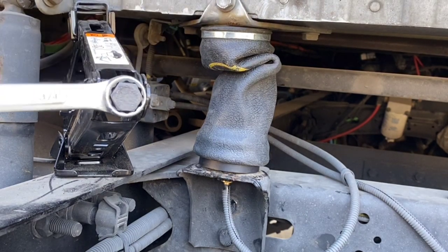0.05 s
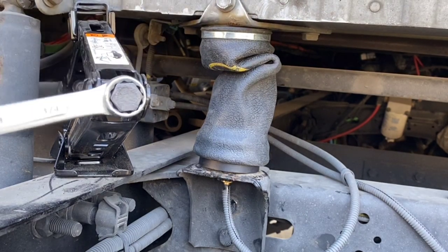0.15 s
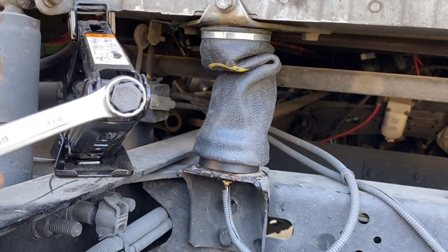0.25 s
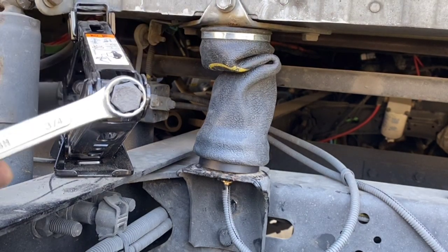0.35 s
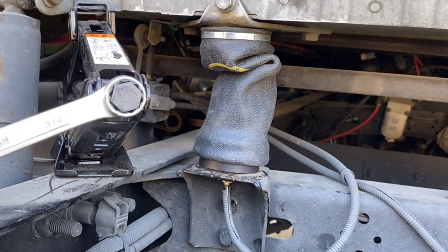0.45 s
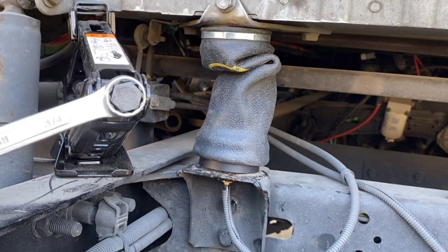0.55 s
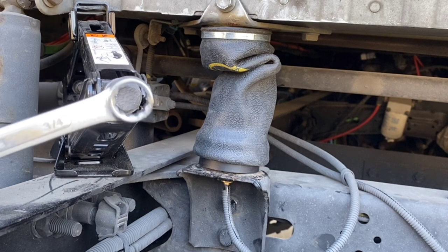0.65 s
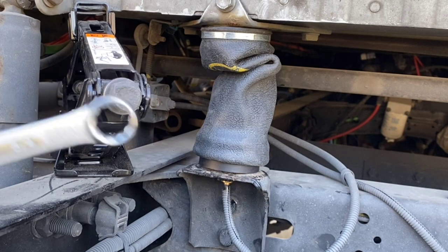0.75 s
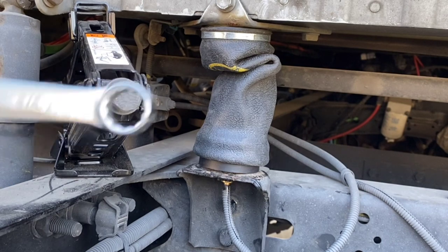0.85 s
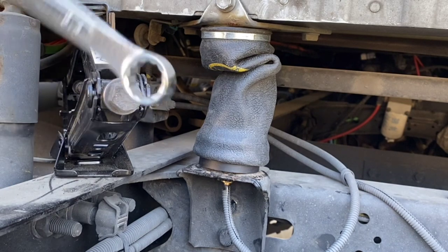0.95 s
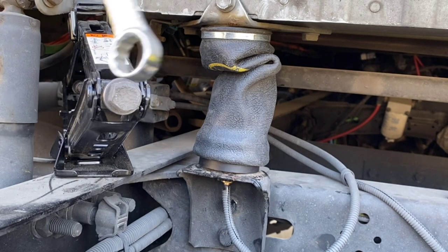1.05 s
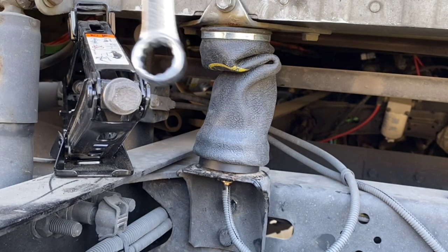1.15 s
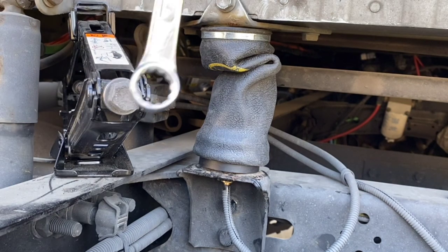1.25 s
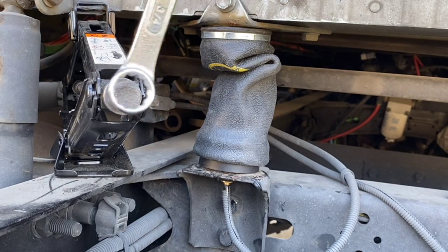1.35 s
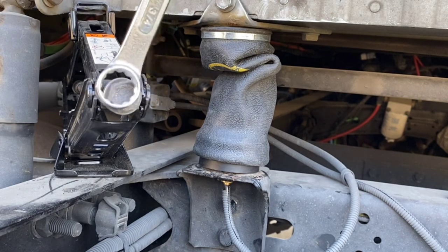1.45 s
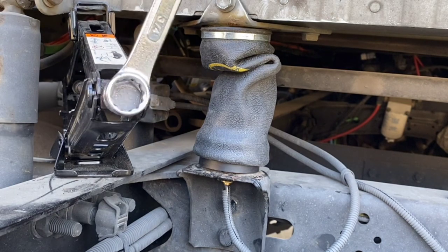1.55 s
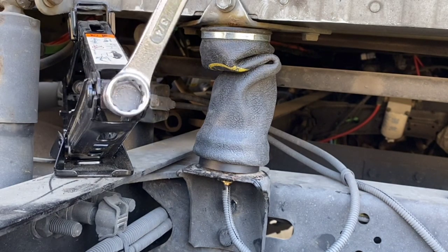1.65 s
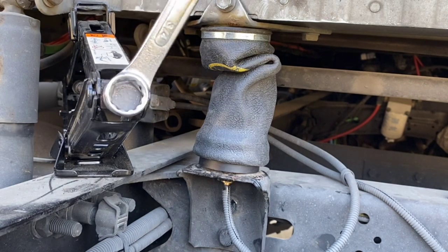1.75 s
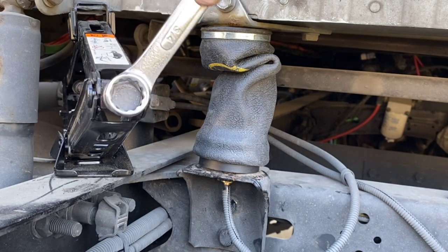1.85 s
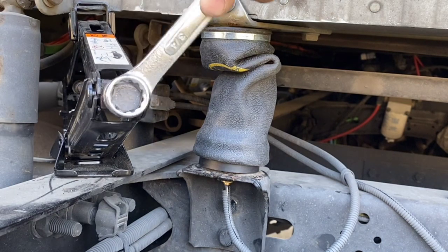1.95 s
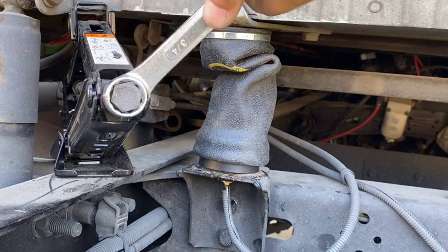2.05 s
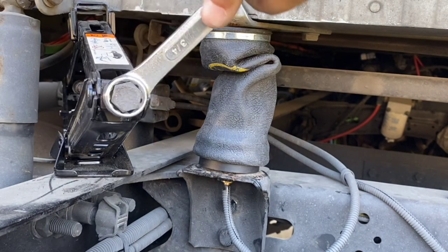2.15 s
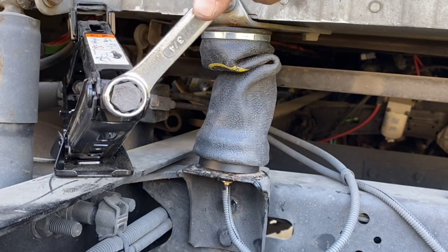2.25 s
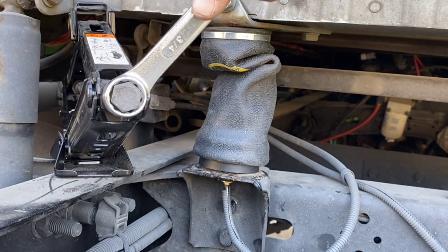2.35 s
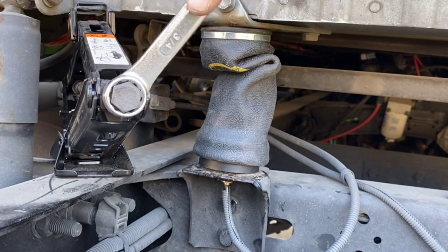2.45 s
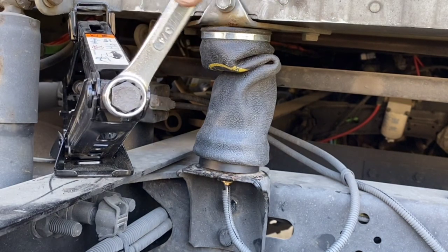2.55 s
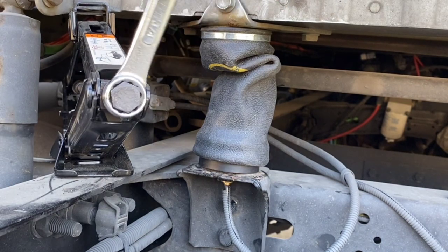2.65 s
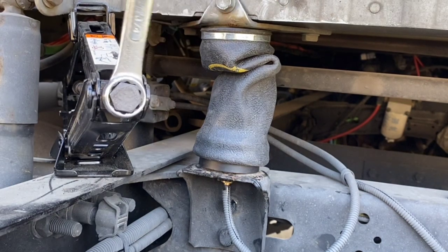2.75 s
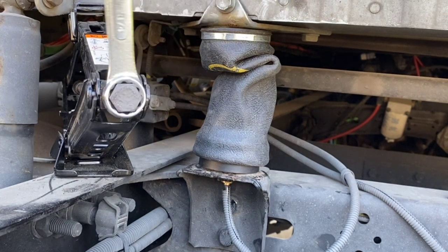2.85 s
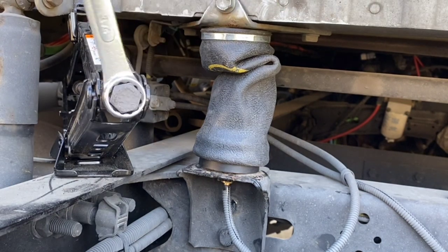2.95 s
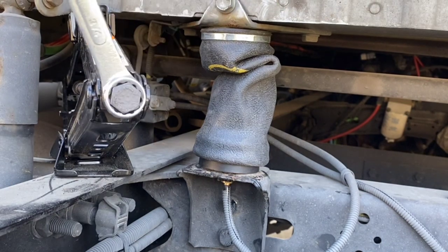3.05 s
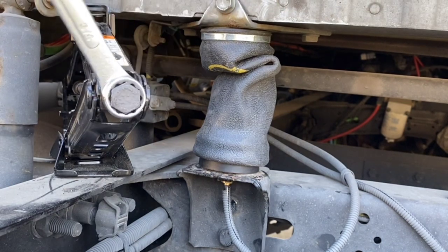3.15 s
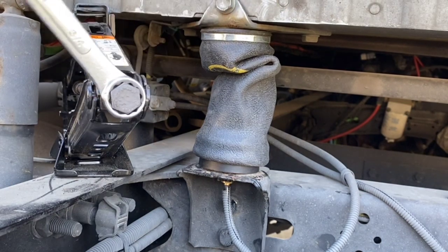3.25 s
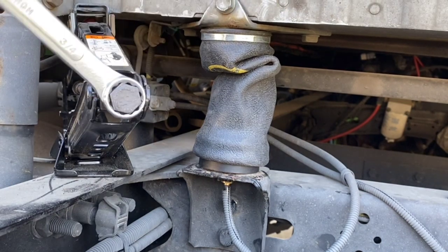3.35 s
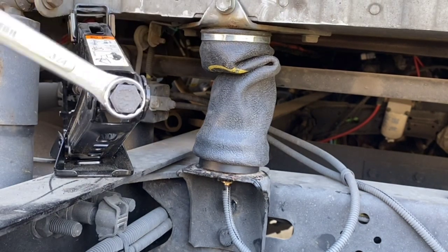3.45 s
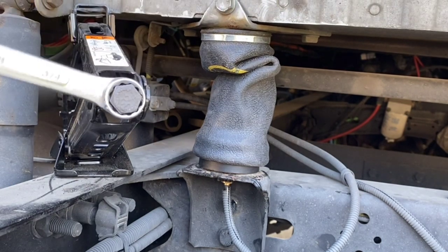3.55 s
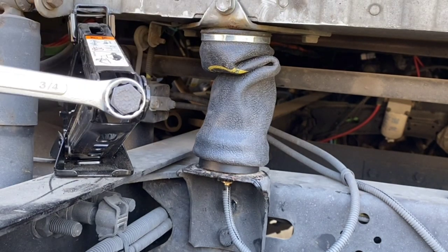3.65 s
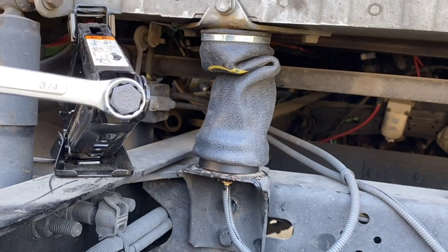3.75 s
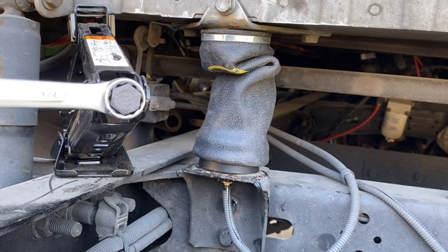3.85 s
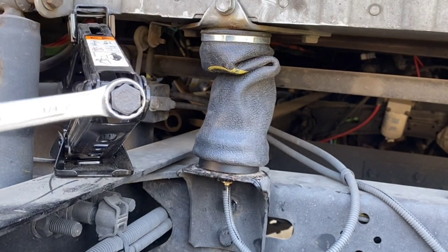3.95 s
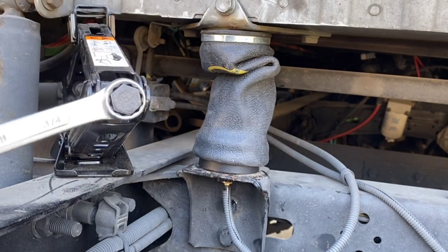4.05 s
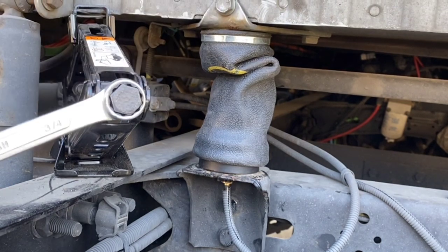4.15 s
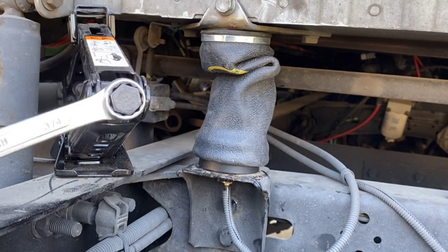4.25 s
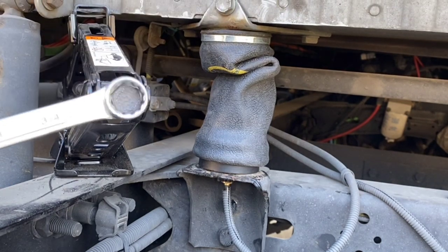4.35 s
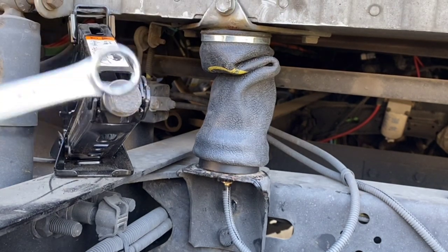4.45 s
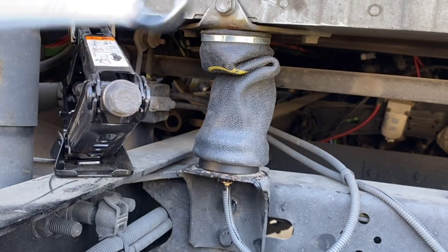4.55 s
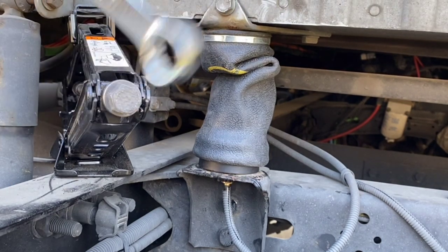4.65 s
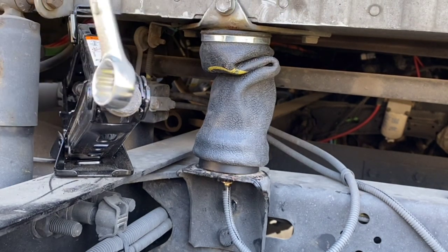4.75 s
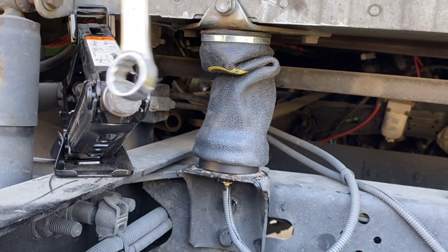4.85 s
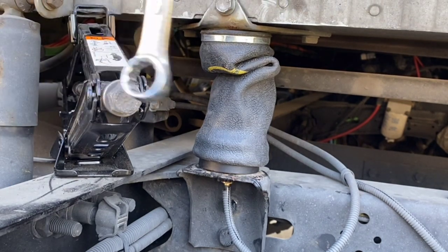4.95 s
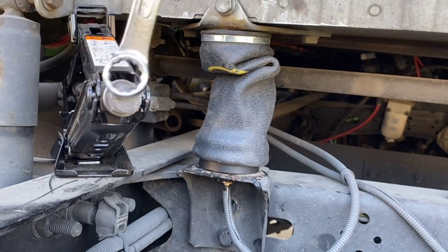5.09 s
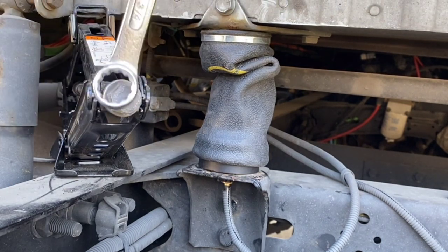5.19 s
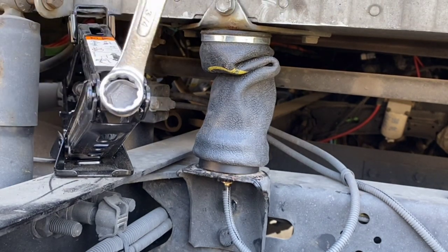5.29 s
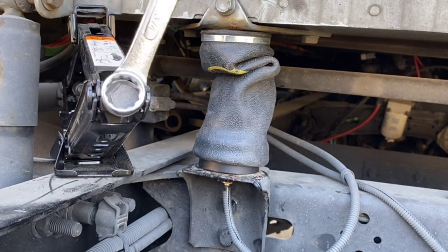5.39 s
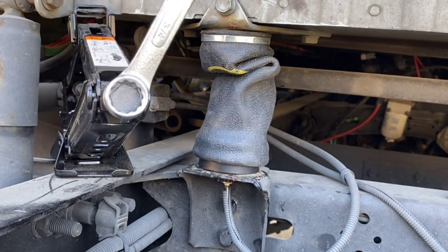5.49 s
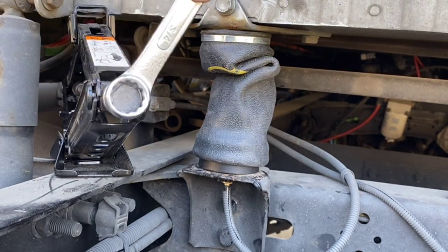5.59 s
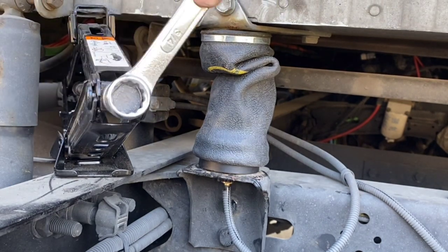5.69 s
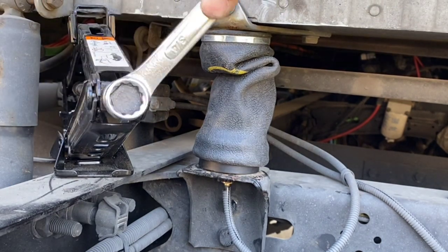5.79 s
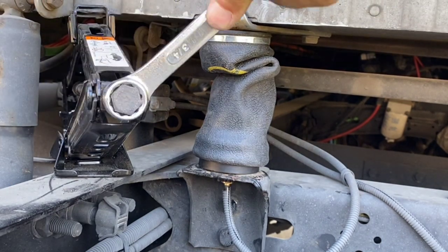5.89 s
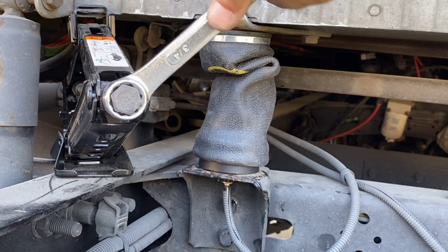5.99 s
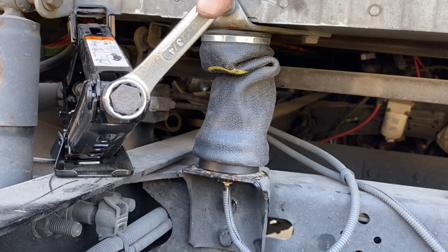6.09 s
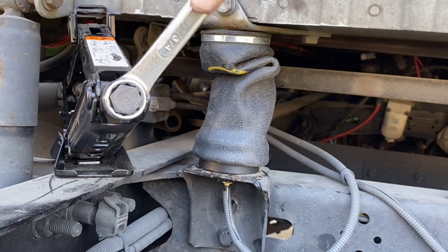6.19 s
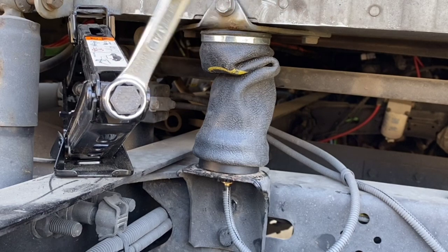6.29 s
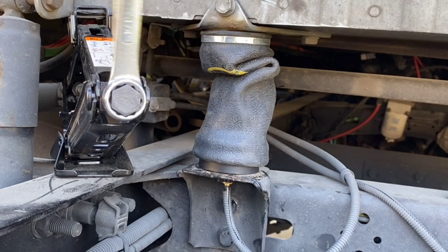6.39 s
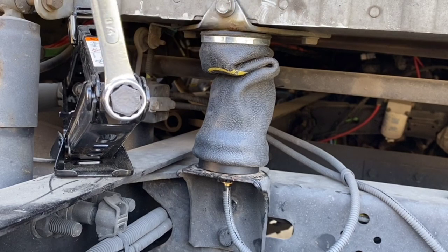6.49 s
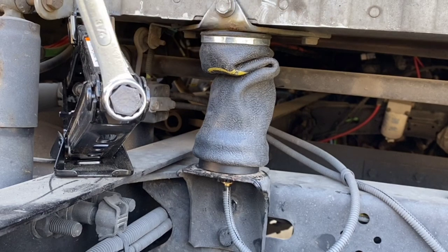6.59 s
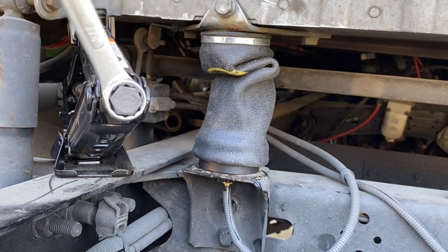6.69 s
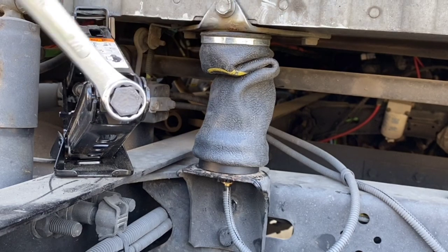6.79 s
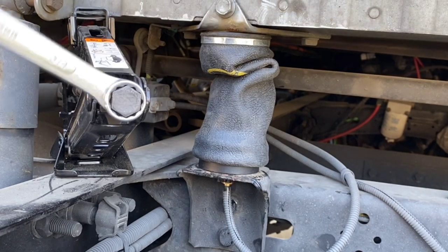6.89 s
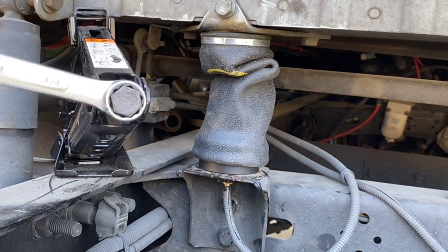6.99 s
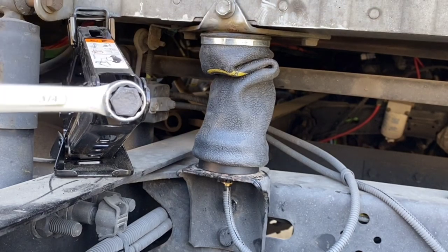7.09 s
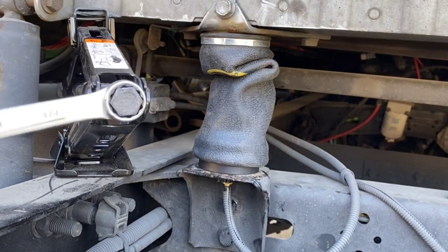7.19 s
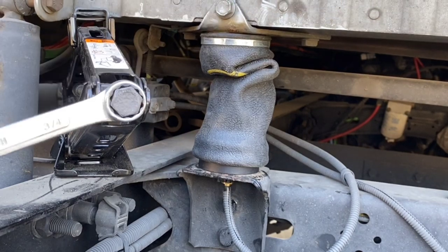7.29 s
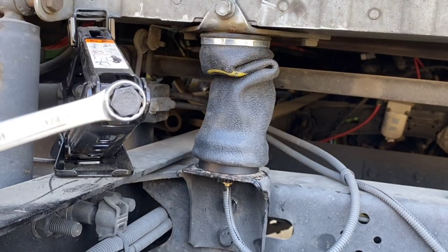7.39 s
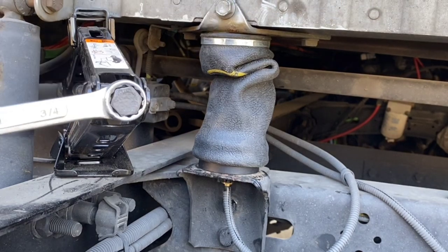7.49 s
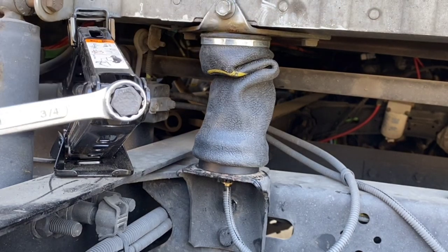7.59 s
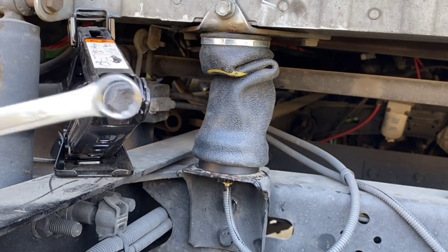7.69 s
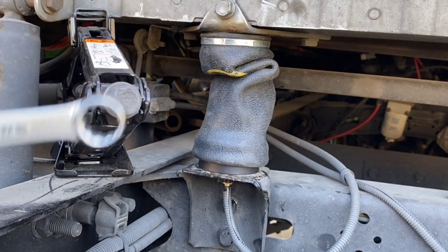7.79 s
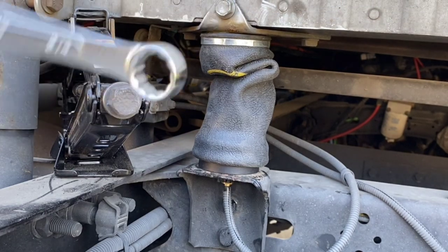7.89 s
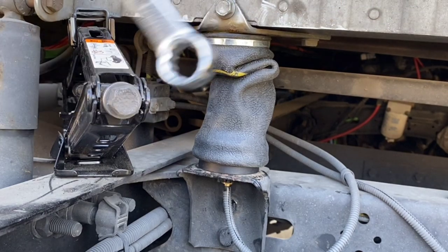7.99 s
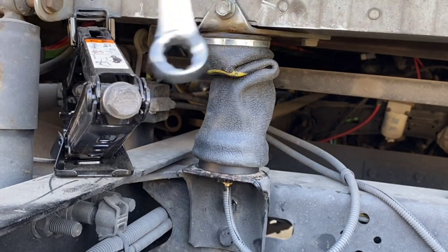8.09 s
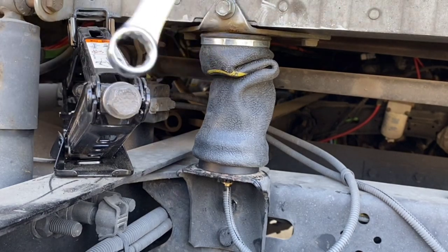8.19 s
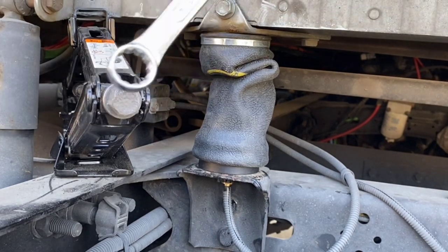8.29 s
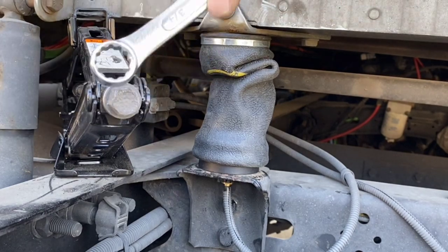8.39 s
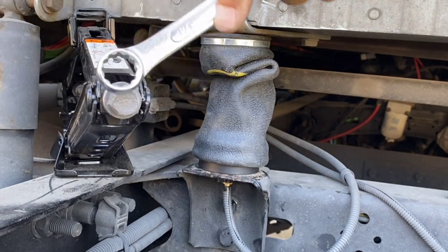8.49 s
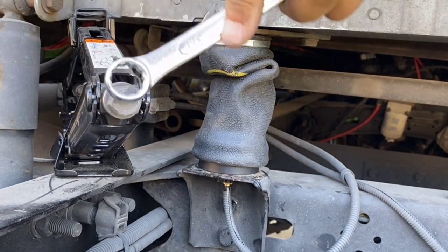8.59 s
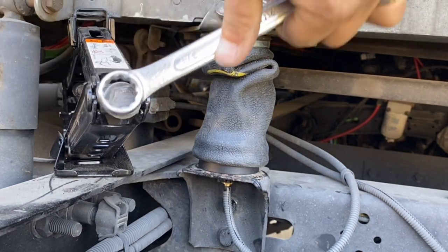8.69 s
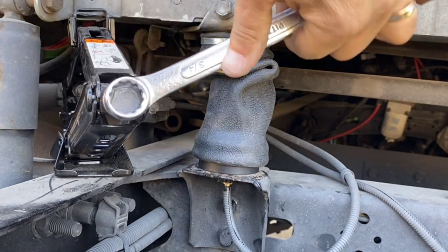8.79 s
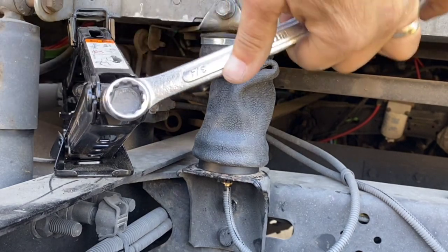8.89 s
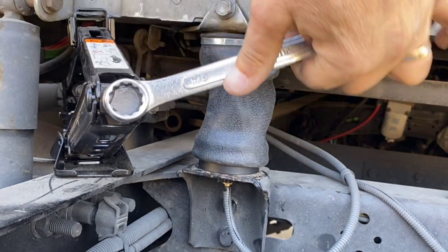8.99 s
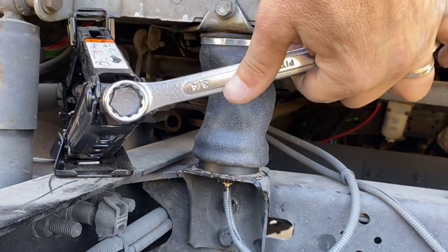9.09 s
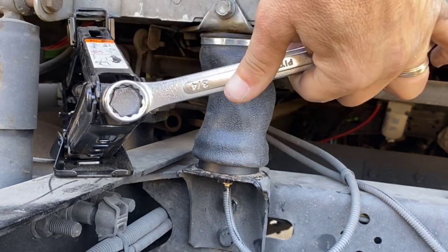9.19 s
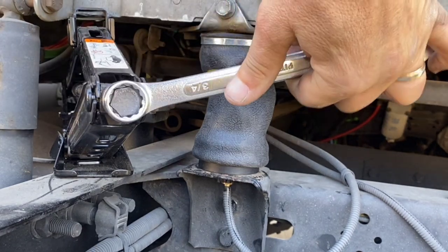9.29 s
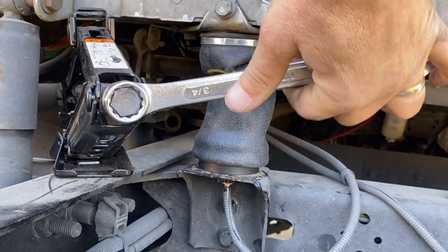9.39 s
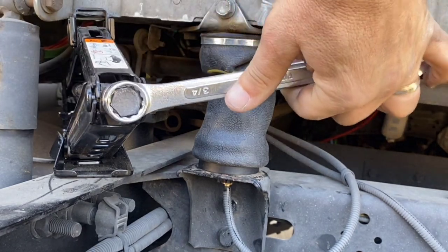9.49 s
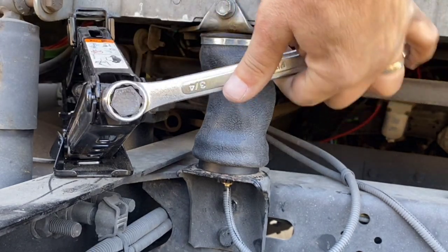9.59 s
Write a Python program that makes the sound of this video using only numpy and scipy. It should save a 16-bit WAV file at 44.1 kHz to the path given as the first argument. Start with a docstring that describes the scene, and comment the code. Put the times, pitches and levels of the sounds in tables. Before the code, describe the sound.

A wrench clacks, clinks and scrapes on a steel bolt head in short irregular bursts, over low outdoor traffic rumble and an idling drone.

```python
"""Outdoors, a scissor jack standing on a truck's frame is let down with a ring wrench.
The wrench knocks and scrapes on the hex head: bursts of tiny hits ring the wrench, jack and frame.
Soft rubs are fine slips heard through the jack; one dull rub, as the hand changes its hold, is noise.
Traffic is noise plus a low drone, under thin air and a bright hiss that fades early.
Near the end a distant engine speeds up: a wavering sine that climbs in pitch."""
import sys
import numpy as np
from scipy import signal
from scipy.fft import rfft, irfft, next_fast_len
from scipy.io import wavfile

SR = 44100
rng = np.random.default_rng(int(sys.argv[2]) if len(sys.argv) > 2 else 0)


def master_out(mix):
    """Clip the mix to full scale and print it as 16-bit PCM to the path in sys.argv[1]."""
    frames = np.transpose(np.atleast_2d(mix))
    ceiling = np.clip(frames, -1, 1)
    pcm = np.round(ceiling * 32767).astype(np.int16)
    wavfile.write(sys.argv[1], SR, pcm)


N = 425124   # length in samples

# Pitch registers of a contact, from thud, clunk, clonk, clank and clink to tick.
# Each row: lower edge in Hz, upper edge in Hz.
REGISTERS_HZ = [(130, 450), (450, 1050), (1050, 2050), (2050, 3200), (3200, 8500), (8500, 16000)]
# Knocks of the wrench on the hex head. Each row: start in seconds, chatter time in seconds, level in dB,
# brightness in dB per octave, midrange in dB, ring-out in dB, wrench note in Hz.
KNOCKS = [(.2888, 0.0035, -14, 0.5, -2.5, 1.5, 3856), (.601, 0.037, -31.5, -3, -6, -10, 1700),
          (.652, 0.00081, -28, -2.2, 6.5, 5, 1750), (1.442, 0.011, -22, 3, -9.5, 7, 4150),
          (1.547, 0.0085, -27, 1.6, -2, -3, 1800), (1.666, 0.0095, -31.5, -2.1, 1, -2.5, 3720),
          (1.904, 0.0015, -51, -0.5, -25, 6, 1652), (2.034, 0.019, -18.5, -3.1, 1.5, -5.5, 2356),
          (2.089, 0.0013, -43.5, -1, -12, -5, 2110), (2.182, 0.013, -39, -6.5, 13, -7.5, 1614),
          (2.5883, 0.0082, -36, 4, -14, -11.5, 3500), (2.625, 0.0027, -25.5, 5.5, -9, -0.5, 1295),
          (2.902, 0.0034, -66.5, 3, -19, -13, 3560), (3.226, 0.0024, -56.5, 1.2, -10.5, -6, 1296),
          (3.989, 0.001, -49, 7.5, -1.5, -14, 2490), (4.1222, 0.004, -29, 10.5, 21.5, -5, 2245),
          (4.125, .0015, -16, 3, -0.5, -1.5, 2400), (4.307, 0.058, -35.5, -2.5, -3, 1, 1450),
          (5.13, 0.0044, -30, 3.5, -8, 2, 3430), (5.189, 0.0067, -31.5, 3.4, 0, 2.5, 4888),
          (5.371, 0.0022, -35.5, -4.5, 5.5, 2.5, 1455), (5.424, 0.012, -35, -2.8, 3, 10.5, 1500),
          (5.466, .003, -25, -2.5, -1, -5, 1808), (5.9828, 0.009, -38.5, 0.8, -12, 8.5, 1440),
          (6.0138, 0.0082, -18, 3, -9.5, -1, 4190), (6.406, 0.01, -55, -1.5, -26, 4, 1640),
          (6.582, 0.0047, -44.5, -1.5, -3.5, 1, 2690), (6.9135, 0.0026, -60, 2.5, -9.5, 0, 5560),
          (7.412, 0.0074, -31, -4.5, 11.5, 7.5, 1017), (7.439, 0.017, -34, -4, 12, -11, 1020),
          (7.5005, 0.0011, -47.5, -1.4, -16, -23, 3430), (8.132, 0.0018, -53, 5.5, -19.5, -7, 9603),
          (8.223, 0.0011, -54, 8.5, -9.5, -9, 2917), (8.3615, .002, -64, 2, -17, -14, 4290),
          (8.706, 0.016, -16, 1.1, 4.5, 4, 1587), (8.779, 0.0025, -17.5, -0.1, 4, 5.5, 1668),
          (8.79, 0.013, -15.5, 0.1, -0.5, -4, 3156), (8.905, 0.012, -34, -6, 14, 2, 1570),
          (8.952, 0.011, -30.5, -6.5, 11, 0, 1675), (8.998, 0.0019, -37.5, 0, -4, 9.5, 1740),
          (9.009, 0.0068, -31.5, 1, -7.5, -3, 1840), (9.192, 0.0051, -50, -4, 9, 5, 3414),
          (9.561, 0.014, -18, 3.5, -4, 7, 5170)]
# Scrapes of steel sliding on steel. Each row: start in seconds, length in seconds, level in dB,
# brightness in dB per octave, midrange in dB, wrench note in Hz.
SCRAPES = [(.273, 0.008, -28.5, 3, 12, 2390), (.631, 0.037, -17, 2, 12.5, 2210),
           (1.525, 0.027, -26, 5, 11.5, 1807), (1.675, 0.033, -43, -5.5, -6.5, 2244),
           (1.918, 0.017, -36, -8.5, 8.5, 1430), (1.968, 0.037, -25.5, -.2, 12, 1167),
           (1.986, 0.033, -23.5, -2, -2.5, 1800), (2.835, 0.013, -54, -1, 2, 1070),
           (2.904, 0.0094, -60, -9.5, 2, 1650), (3.155, 0.029, -55.5, -10, 8.5, 1400),
           (3.42, .02, -64, -6.5, 8.5, 1205), (4.338, 0.063, -14.5, -0.5, 3, 1467),
           (5.437, 0.019, -30.5, -0.1, 4.5, 1520), (5.773, .024, -26, -2.5, -2, 1800),
           (5.838, 0.016, -17, -1.4, -2, 1703), (5.875, 0.043, -35, -2, 5.5, 1640),
           (7.637, 0.063, -17, 0.6, 4, 1771), (8.746, .018, -27, -3, 1.5, 1640),
           (9.05, 0.039, -42, -5, 0, 1690), (9.521, 0.019, -26, -3, 5.5, 1820)]
# Soft strokes of the rubbing screw and wrench. Each row: middle in seconds, width in seconds, level in dB.
RUBS = [(2.92, 0.24, -61.5), (3.15, .09, -59.5), (3.675, 0.019, -49.5), (3.75, 0.017, -52),
        (3.84, 0.016, -52.5), (3.97, .025, -56), (4.55, 0.18, -54.5), (6.44, 0.056, -55.5),
        (6.592, 0.04, -47), (6.85, 0.11, -60.5), (7.28, 0.032, -56.5), (7.56, 0.12, -59),
        (7.85, 0.037, -60.5), (8.041, .02, -56.5)]
# Level of each register in an ordinary knock. Each entry: level in dB, from thud to tick.
KNOCK_REGISTERS_DB = [-10.5, -1, -6.5, -10, -13, -21]
# Level of each register in an ordinary scrape. Each entry: level in dB, from thud to tick.
SCRAPE_REGISTERS_DB = [-10, 0, -7.5, -9, -14, -18]
# Single ringing notes (modes) of jack and frame.
# Each row: pitch in Hz, average height above the dense modes in dB, time to die by 60 dB in seconds.
FRAME_MODES = [(151.7, 11.5, 0.6), (303.5, 14.5, 0.31), (413.3, 13.5, 0.62), (537.6, 12.5, 0.53),
               (580, 8, 0.083), (678, 4.5, 0.43), (732, 10, 0.12), (836, 8, 0.85), (987.5, 12, 0.33),
               (1080, -8, 0.29), (1338, 6.5, .22), (1478, 14, 0.24), (1640, 16, 0.22), (1750, 11, 0.35),
               (1804, 5, 0.45), (2296, 12, 0.24), (2780, 11.5, .15), (3310, 2, 0.037), (4700, -9, 0.19),
               (5413, 5, 0.011), (6200, 3.5, 0.23), (7460, 12, 0.047), (9970, 11.5, 0.031),
               (10460, 3, 0.06), (14520, 19, 0.072)]
# Overall colour of the steel. Each row: frequency in Hz, strength in dB per Hz.
STEEL_COLOUR = [(100, -11.5), (155, -10), (240, -21), (400, -13), (550, -6), (800, 1.5), (1150, -7),
                (1650, -11), (2600, -22), (4500, -10), (6200, -17.5), (8200, -25), (11000, -29.5),
                (14800, -41.5), (16000, -50.5)]
# How alike left and right are in the ringing. Each row: frequency in Hz, correlation (no unit).
RING_LIKENESS = [(130, 0.36), (300, 0.99), (640, 0.34), (1400, 0.16), (2200, .85), (4000, 1), (8000, 0.92),
                 (15000, 0.1)]
# Colour of the screw's rub, with the resonances of the arms.
# Each row: frequency in Hz, strength in dB per Hz.
SCREW_COLOUR = [(350, 6.5), (560, 6.5), (800, -2.5), (1120, 13.5), (1900, -2.5), (2700, 4), (3200, 3.5),
                (3700, 3.5), (4800, -2), (5900, -3.5), (8000, -4), (11000, 0), (16000, -5.5)]
# Colour of the dull rub of the hand. Each row: frequency in Hz, strength in dB per Hz.
GRIP_COLOUR = [(90, -30), (150, -4.5), (225, -2.5), (300, -3.5), (450, -14), (600, -13.5), (720, -22.5),
               (900, -20.5), (1200, -31), (2000, -67)]
# Strength of the traffic's rumble and drone over time. Each row: time in seconds, change in dB.
TRAFFIC_STRENGTH = [(0, -1.5), (1.0, -2), (1.75, -3), (2.2, -2.5), (2.6, -0.5), (4.1, -3), (5.5, -1.5),
                    (6.35, -1.5), (6.62, 1.5), (7.0, .5), (8.7, -1.5), (9.1, 0.5), (9.64, -3)]
# Colour of the traffic rumble. Each row: frequency in Hz, strength in dB per Hz.
RUMBLE_COLOUR = [(15, -43), (25, -19.5), (32, -19), (42, -5), (55, -1.5), (90, 0), (125, -8.5), (165, -5.5),
                 (195, -14), (235, -30), (400, -62)]
# Colour of the thin air. Each row: frequency in Hz, strength in dB per Hz.
AIR_COLOUR = [(120, -18.5), (200, -4.5), (268, -11), (322, -12), (456, -13), (933, -16.5), (1080, -24),
              (1230, -20.5), (2510, -31.5), (4040, -52), (9060, -39), (11100, -33), (16000, -38)]
# Colour of the bright hiss at the start. Each row: frequency in Hz, strength in dB per Hz.
HISS_COLOUR = [(150, -35), (250, -2), (674, -11), (802, -11.5), (875, -3.5), (2490, -14.5), (3710, -10.5),
               (4260, -19.5), (6940, -11), (9010, -11.5), (10900, -16), (13200, -16), (16000, -15)]
# How alike left and right are in the background and rubs. Each row: frequency in Hz, correlation (no unit).
AIR_LIKENESS = [(60, .85), (200, 0.92), (400, 0.17), (1300, .05), (2400, 0.73), (4400, 1), (15000, 0.18)]
# Treble phase between the microphone ports. Each row: frequency in Hz, lead of the left side in radians.
PORT_PHASE = [(0, 0), (7300, 0), (8500, -2.8), (9400, -3.3), (10800, -6.1), (11600, -6.5), (12700, -9.2),
              (13900, -9.6), (14600, -12.3), (16100, -12.7)]
# Dips of the microphone ports. Each row: centre in Hz, width in Hz.
PORT_DIPS = [(8950, 800), (9250, 800), (13150, 900), (13500, 900)]

RING_SIZE = 32768   # samples in each ringing sound
LEVEL_WINDOW_S = 0.05   # a contact's level is its energy spread over this time
MIDDLE_HZ, REACH_OCTAVES = 1467, 3   # centre and reach of the brightness tilt and midrange arch
NOTE_LIFT_DB, NOTE_LIFT_OCTAVES = 5.5, 0.6   # registers near the wrench's note stand out
# the wrench's overtone as a pitch ratio, then the height of both notes above the dense modes
OVERTONE_RATIO, NOTE_DB, OVERTONE_DB = 1.98, 19.5, 13
SCRAPE_BITE = 0.6   # under 1: a scrape takes hold quickly
SMALL_MODE_COUNT = 36
FRAME_CUT_HZ = 6200
SLIPS_PER_S, SLIP_SPREAD_DB = 630, 3   # the fine stick and slip of a rub
GRIP_START_S, GRIP_ATTACK_S, GRIP_HOLD_S, GRIP_T60_S, GRIP_DB = 1.038, 0.016, 0.13, 0.26, -29.5
ENGINE_START_S, ENGINE_START_HZ, ENGINE_HZ_PER_S, ENGINE_ATTACK_S = 7.7, 127.7, 24, 0.26
ENGINE_LOUDEST_S, ENGINE_SWELL_S, ENGINE_DB = 9.1, 0.18, -34.5
RUMBLE_DB, AIR_DB = -36, -51.5
DRONE_HZ, DRONE_DB = 58.1, -43   # an idling engine
# the hiss sinks ever faster and is 30 dB down after HISS_FADE_S
HISS_DB, HISS_FADE_S, HISS_FADE_POWER = -43.5, 1.85, 4.7
CUTOFF_HZ = 16200


def from_db(db):
    """Turn decibels into a gain."""
    return 10 ** (np.asarray(db) / 20)


def unit(x):
    """Scale a sound to an average (rms) strength of 1."""
    return x / np.sqrt(np.mean(x ** 2) + 1e-20)


def at_hz(points, hz):
    """Read a table between its rows, on a logarithmic frequency axis."""
    f, value = np.transpose(points)
    return np.interp(np.log(hz + 1), np.log(f + 1), value)


def band_filter(x, order, edges_hz, kind):
    """Keep one part of the frequency range."""
    return signal.sosfilt(signal.butter(order, edges_hz, kind, fs=SR, output="sos"), x)


def stereo_colour(pair, spectrum, likeness):
    """Turn two unrelated signals into left and right with a given colour and likeness."""
    size = next_fast_len(pair.shape[1] + 2048)
    hz = np.fft.rfftfreq(size, 1 / SR)
    mid, side = rfft(pair, size) * from_db(at_hz(spectrum, hz))
    alike = np.clip(at_hz(likeness, hz), -0.99, 0.99)
    shared = np.sqrt(1 + alike) * mid
    opposed = np.sqrt(1 - alike) * side * [[1], [-1]]
    return irfft(shared + opposed, size)[:, :pair.shape[1]]


def drift(rate):
    """Wander by chance: random points, rate of them per second, joined by straight lines."""
    knots = rng.standard_normal(4096)
    return np.interp(np.arange(N) / SR * rate, np.arange(len(knots)), knots)


def noise(spectrum, level_db, flutter_db, rate):
    """Make stereo noise of a given colour whose level flutters."""
    bed = stereo_colour(rng.standard_normal((2, N)), spectrum, AIR_LIKENESS)
    return from_db(level_db) * unit(bed * from_db(flutter_db * drift(rate)))


def knocks(jacks):
    """A first hard touch, then a brief chatter as the wrench seats."""
    out, t = np.zeros((2, N)), np.arange(RING_SIZE) / SR
    for k, (s, chatter_s, level_db, bright_db, midrange_db, ring_db, note_hz) in enumerate(KNOCKS):
        clack, ring = jacks[k % len(jacks)]
        pressure = np.exp(-(t / max(chatter_s, 0.001)) ** 2)
        force = micro_impacts(pressure, per_s=2600, spread_db=-0.5)
        force[0] += 1.5   # the first touch
        body = clack + from_db(ring_db) * ring
        # a touch that is held fast leaves the wrench damped as well
        body = body + from_db(min(ring_db, 0)) * wrench(note_hz, t60=0.087)
        levels_db = contact_levels(KNOCK_REGISTERS_DB, level_db, bright_db, midrange_db, note_hz)
        add_contact(out, s, force, body, levels_db)
    return out


def scrapes(jacks):
    """The ring of the wrench judders over the flats: the slips swell and then die away."""
    out, t = np.zeros((2, N)), np.arange(RING_SIZE) / SR
    for k, (s, length_s, level_db, bright_db, midrange_db, note_hz) in enumerate(SCRAPES):
        clack, ring = jacks[k % len(jacks)]
        progress = np.minimum(t / length_s, 1)
        pressure = np.abs(np.sin(np.pi * progress)) ** SCRAPE_BITE
        force = micro_impacts(pressure, per_s=1700, spread_db=7.5)
        body = clack + from_db(-1.0) * ring + wrench(note_hz, t60=0.14)
        levels_db = contact_levels(SCRAPE_REGISTERS_DB, level_db, bright_db, midrange_db, note_hz)
        add_contact(out, s, force, body, levels_db)
    return out


def micro_impacts(pressure, per_s, spread_db):
    """Steel on steel touches many times; the hits follow the pressure and vary in size."""
    hits = rng.random(RING_SIZE) < per_s / SR
    direction = rng.choice([-1, 1], RING_SIZE)
    size = from_db(spread_db * rng.uniform(-1.8, 0.75, RING_SIZE))
    return pressure * hits * direction * size


def contact_levels(ordinary_db, level_db, bright_db, midrange_db, note_hz):
    """A harder touch tilts the sound upwards, a fuller one arches its middle; the note lifts its register."""
    centres_hz = np.sqrt(np.prod(REGISTERS_HZ, axis=1))
    octaves = np.log2(centres_hz / MIDDLE_HZ)
    tilt_db = bright_db * octaves
    arch_db = -midrange_db * (octaves / REACH_OCTAVES) ** 2
    from_note = np.log2(centres_hz / note_hz) / NOTE_LIFT_OCTAVES
    lift_db = NOTE_LIFT_DB * np.exp(-from_note ** 2)
    return level_db + np.array(ordinary_db) + tilt_db + arch_db + lift_db


def add_contact(out, s, force, body, levels_db):
    """Play a force through the body; place and hardness of the contact set each register's level."""
    sound = signal.fftconvolve(body, force[None], axes=1)[:, :RING_SIZE]
    sound = stereo_colour(sound, STEEL_COLOUR, RING_LIKENESS)
    start = int(s * SR)
    for edges_hz, db in zip(REGISTERS_HZ, levels_db):
        part = unit(band_filter(sound, 3, edges_hz, "band"))
        part = from_db(db) * part * np.sqrt(LEVEL_WINDOW_S * SR / RING_SIZE)
        out[:, start:start + RING_SIZE] += part[:, :N - start]


def wrench(note_hz, t60):
    """The two bending notes this hold leaves free; the hand damps the higher one faster."""
    overtone = mode(note_hz * OVERTONE_RATIO, OVERTONE_DB, t60 * 0.5)
    return mode(note_hz, NOTE_DB, t60) + overtone


def jack():
    """One chance version of the jack: the short clack of its arms, the longer ring of frame and underbody."""
    # rows inside dense_modes: frequency in Hz, time to die by 60 dB in seconds
    clack = dense_modes([(200, 0.19), (1000, 0.061), (3000, 0.086), (11000, 0.012)])
    # the contact itself radiates a short, bright crack
    crack = dense_modes([(2000, 0.04), (12000, 0.036)])
    clack = clack + from_db(-4.5) * band_filter(crack, 2, 2200, "high")
    ring = dense_modes([(150, 0.89), (1000, 0.34), (2800, 0.25), (7000, 0.1), (12000, 0.17)])
    # the heavy frame takes up less of the treble than of the bass
    ring = band_filter(from_db(-1.0) * ring, 1, FRAME_CUT_HZ, "low")
    for hz, db, t60 in FRAME_MODES:
        ring = ring + mode(hz, db + 0.84 * rng.standard_normal(), t60)
    # small modes of the arms get chance pitches; the higher the pitch, the shorter the ring
    small_modes_hz = np.exp(rng.uniform(np.log(2500), np.log(15500), SMALL_MODE_COUNT))
    for hz in small_modes_hz:
        ring = ring + mode(hz, 5 + rng.standard_normal(), t60=0.27 * (hz / 2500) ** -0.5)
    return clack, ring


def mode(hz, db, t60):
    """A dying sine whose resonance is db high; the two sides are a quarter turn apart in phase."""
    t, rate = np.arange(RING_SIZE) / SR, np.log(1000) / max(t60, 0.01)
    phase = rng.uniform(0, 2 * np.pi) + np.array([[0], [np.pi / 2]])
    height = from_db(db) * 2 * rate / SR   # the faster it dies, the harder it must start
    return height * np.exp(-rate * t) * np.sin(2 * np.pi * hz * t + phase)


def dense_modes(t60_by_hz):
    """Countless overlapping modes: noise dying at its own rate in every octave, flat with height 1."""
    t, hz = np.arange(RING_SIZE) / SR, np.fft.rfftfreq(RING_SIZE, 1 / SR)
    white, out = rfft(rng.standard_normal((2, RING_SIZE))), 0
    octave = np.clip(np.round(np.log2((hz + 1) / 125)), 0, 7)
    for k in np.unique(octave):
        fade = from_db(-60 * t / at_hz(t60_by_hz, 125 * 2 ** k))
        out = out + irfft(white * (octave == k)) * fade / np.linalg.norm(fade)
    return out


def rubs(one_jack):
    """Fine slips sound through the jack; each soft stroke swells and sinks evenly about its middle."""
    t, strokes = np.arange(N) / SR, np.zeros(N)
    for middle_s, width_s, db in RUBS:
        distance = np.minimum(np.abs(t - middle_s) / width_s, 20)
        strokes += from_db(db) / np.cosh(distance)
    hits = rng.random(N) < SLIPS_PER_S / SR
    direction = rng.choice([-1, 1], N)
    slips = hits * direction * from_db(SLIP_SPREAD_DB * rng.standard_normal(N))
    clack, ring = one_jack
    sound = signal.fftconvolve(clack + from_db(-5.5) * ring, slips[None], axes=1)[:, :N]
    return strokes * unit(stereo_colour(sound, SCREW_COLOUR, AIR_LIKENESS))


def grip():
    """A dull rub of noise as the hand changes its hold: a quick attack, a hold and a release."""
    t = np.arange(N) / SR - GRIP_START_S
    attack = np.clip(t / GRIP_ATTACK_S, 0, 1)
    released_s = np.clip(t - GRIP_ATTACK_S - GRIP_HOLD_S, 0, 1)
    level_db = GRIP_DB - 60 * released_s / GRIP_T60_S
    return attack * noise(GRIP_COLOUR, level_db, flutter_db=1.0, rate=200)


def far_engine():
    """A far engine speeds up: its note climbs at an even rate while it swells and fades."""
    t = np.arange(N) / SR
    running_s = np.maximum(t - ENGINE_START_S, 0)
    attack = np.minimum(running_s / ENGINE_ATTACK_S, 1)
    swell = attack / np.hypot(1, (t - ENGINE_LOUDEST_S) / ENGINE_SWELL_S)
    climbing_hz = ENGINE_START_HZ + ENGINE_HZ_PER_S * running_s
    return swell * hum(climbing_hz, ENGINE_DB, waver_hz=0.58, waver_db=6.5)


def hum(hz, db, waver_hz, waver_db):
    """The exhaust note of a far engine: a sine that wavers in pitch and level on its way."""
    phase = 2 * np.pi * np.cumsum(hz + waver_hz * drift(12)) / SR
    level_db = db + waver_db * np.tanh(drift(20))
    return np.sqrt(2) * from_db(level_db) * np.sin(phase)


def traffic():
    """Rumbling noise and the drone of an idling engine rise and fall together."""
    s, db = np.transpose(TRAFFIC_STRENGTH)
    strength_db = np.interp(np.arange(N) / SR, s, db)
    rumble = noise(RUMBLE_COLOUR, RUMBLE_DB + strength_db, flutter_db=2.5, rate=11.0)
    return rumble + hum(DRONE_HZ, DRONE_DB + strength_db, waver_hz=3.0, waver_db=1.0)


def early_hiss():
    """Bright noise that holds at first and then sinks ever faster."""
    elapsed = np.minimum(np.arange(N) / SR / HISS_FADE_S, 2)
    fade_db = 30 * elapsed ** HISS_FADE_POWER
    return noise(HISS_COLOUR, HISS_DB - fade_db, flutter_db=1.8, rate=23)


def outdoors():
    """Traffic and engine notes, stronger on the right, under thin air and the early hiss."""
    low = (traffic() + far_engine()) * from_db([[-1.8], [1.4]])   # left, right
    air = noise(AIR_COLOUR, AIR_DB, flutter_db=2.0, rate=6.4) * from_db([[-1.2], [1.0]])
    return low + air + early_hiss()


def scene():
    """Wrench work close by, traffic behind; contacts take turns through five chance versions of the jack."""
    jacks = [jack() for _ in range(5)]
    return knocks(jacks) + scrapes(jacks) + rubs(jacks[0]) + grip() + outdoors()


def record(dry):
    """The microphone ports shift the treble's phase and notch it; peaks overload, the top is cut."""
    size = next_fast_len(N + 2048)
    turn = np.interp(np.fft.rfftfreq(size, 1 / SR), *np.transpose(PORT_PHASE))
    left = irfft(rfft(dry[0], size) * np.exp(1j * turn), size)[:N]
    x = np.array([left, dry[1]])
    for hz, width_hz in PORT_DIPS:
        x = signal.lfilter(*signal.iirnotch(hz, hz / width_hz, fs=SR), x)
    x = np.clip(x, -1, 1)
    return signal.sosfilt(signal.ellip(10, 0.2, 80, CUTOFF_HZ, fs=SR, output="sos"), x)


dry = scene()
out = record(dry)
master_out(out)
```